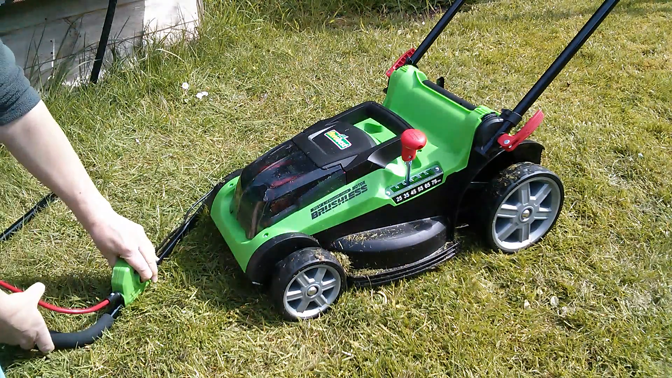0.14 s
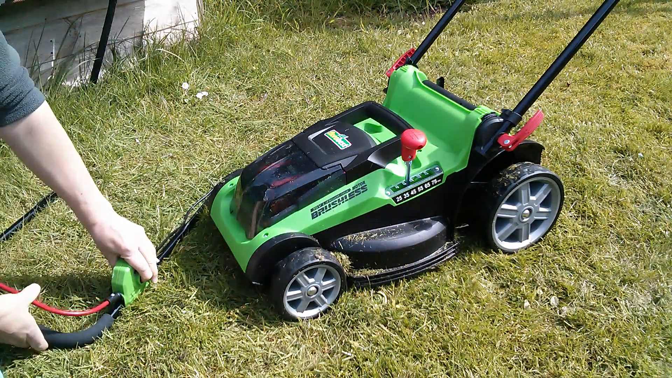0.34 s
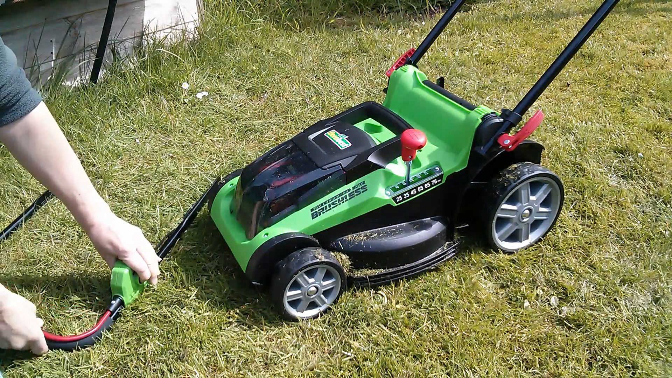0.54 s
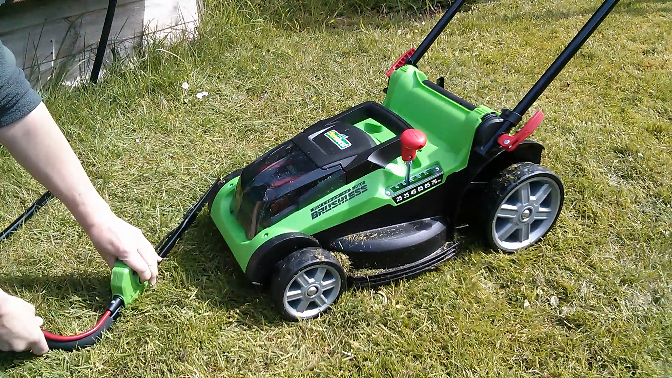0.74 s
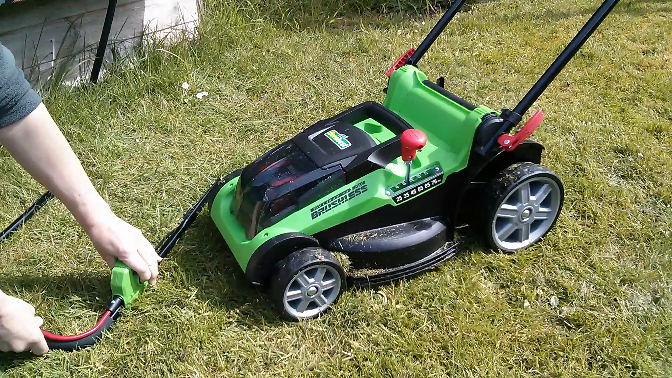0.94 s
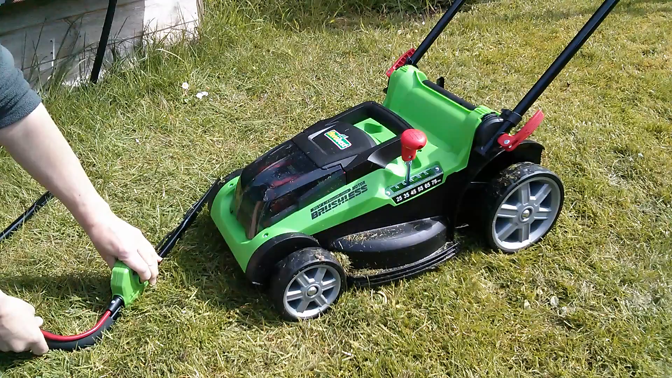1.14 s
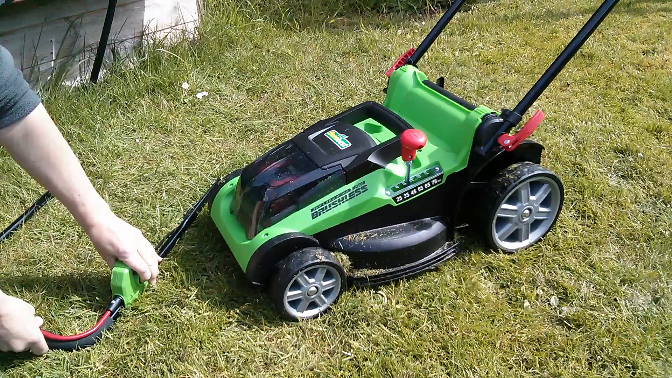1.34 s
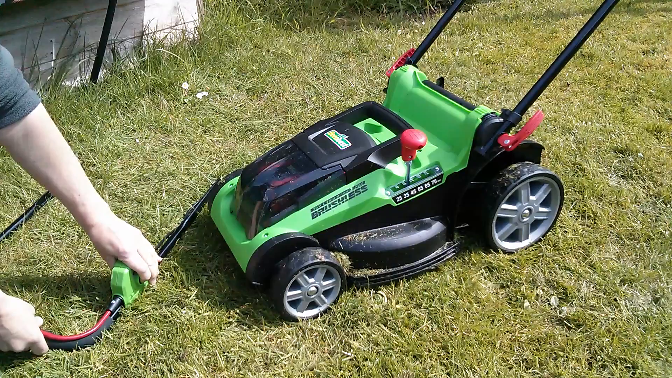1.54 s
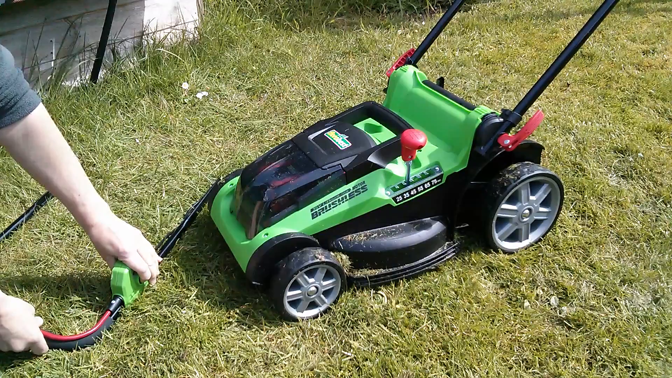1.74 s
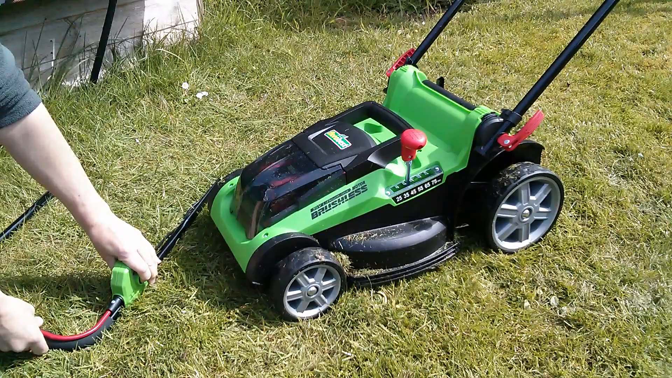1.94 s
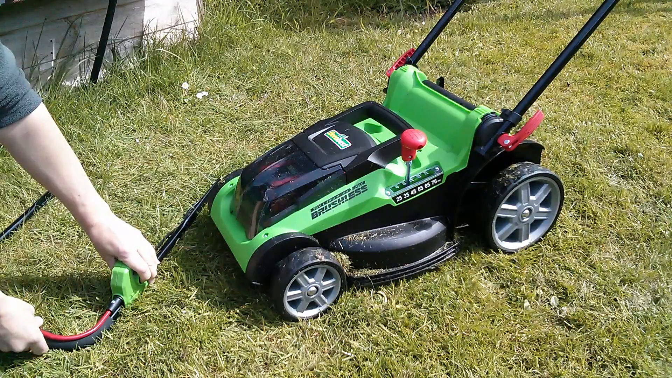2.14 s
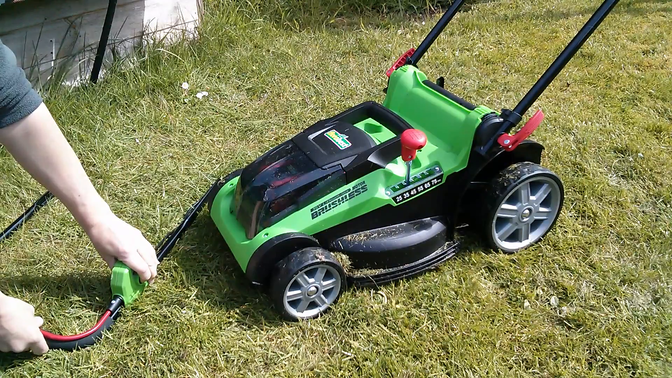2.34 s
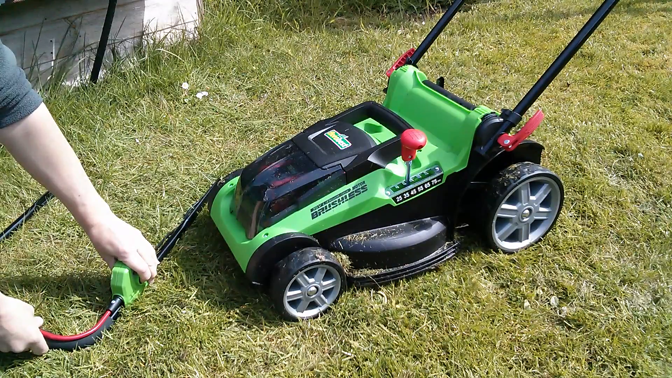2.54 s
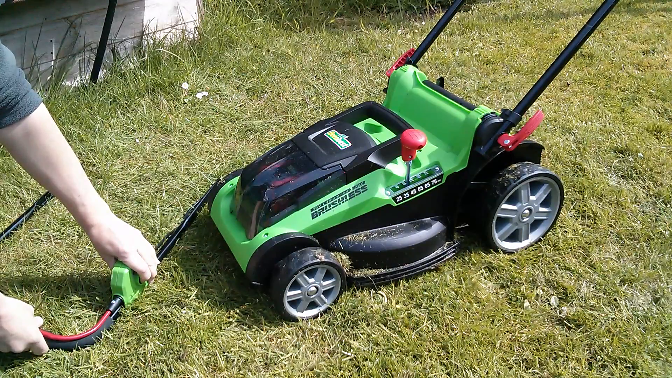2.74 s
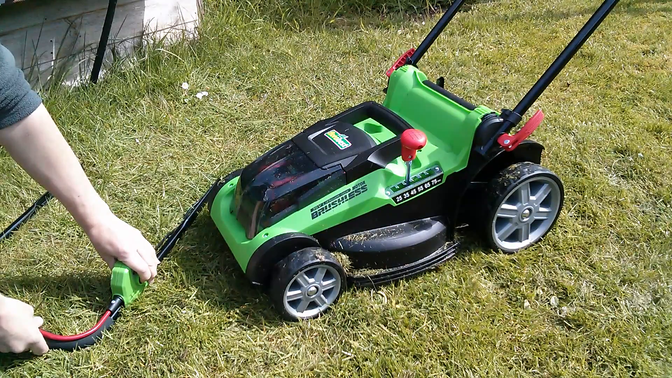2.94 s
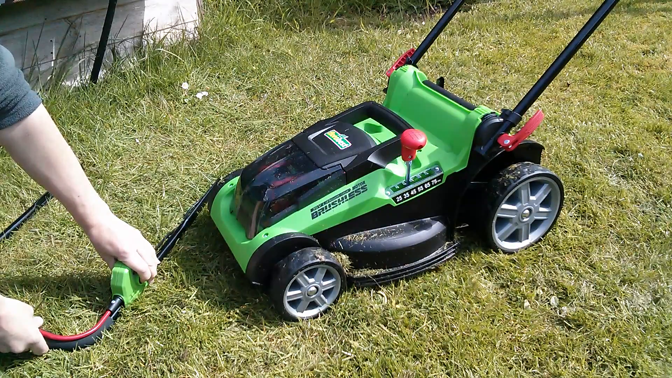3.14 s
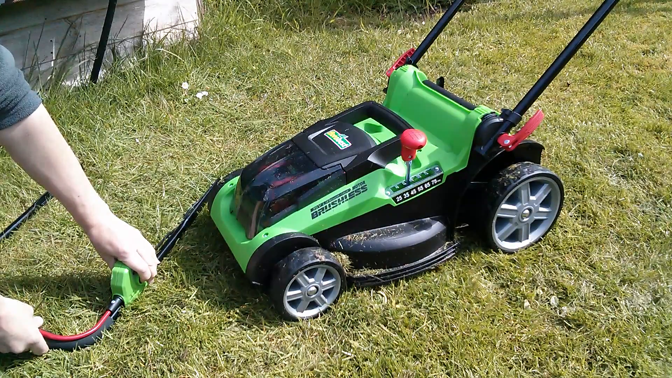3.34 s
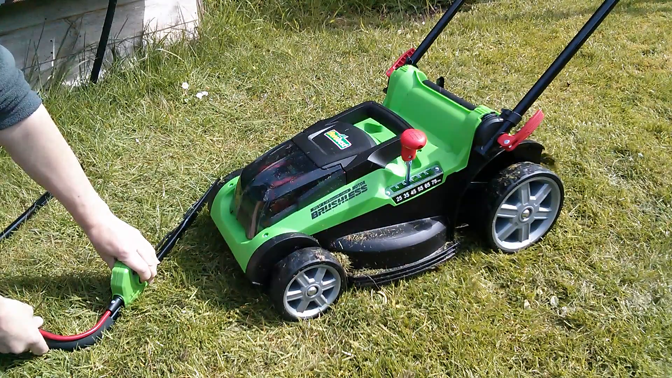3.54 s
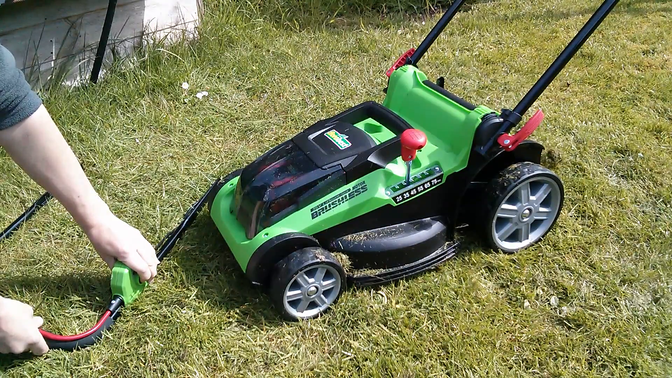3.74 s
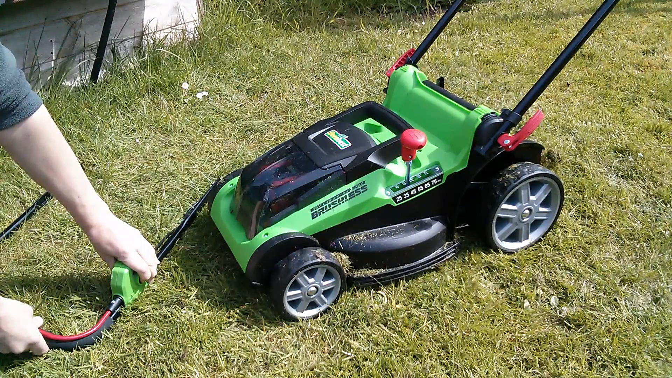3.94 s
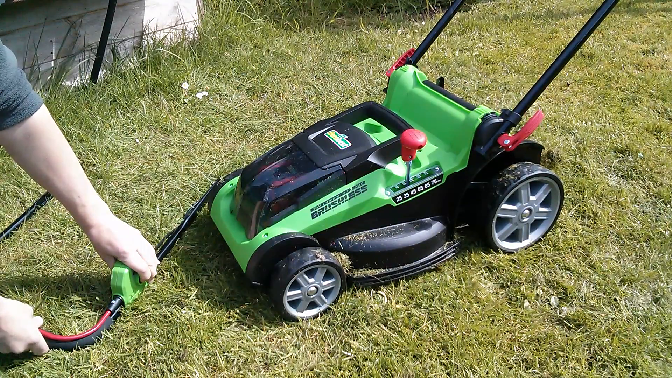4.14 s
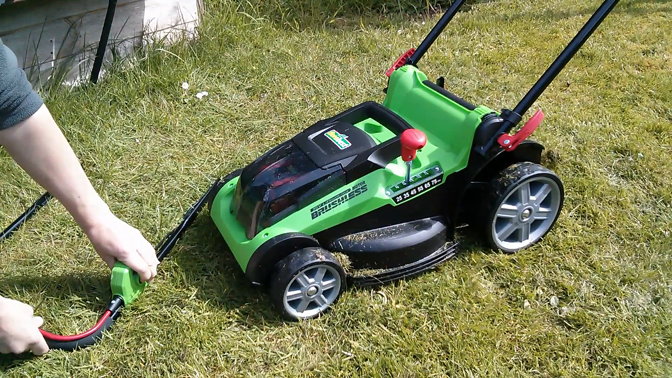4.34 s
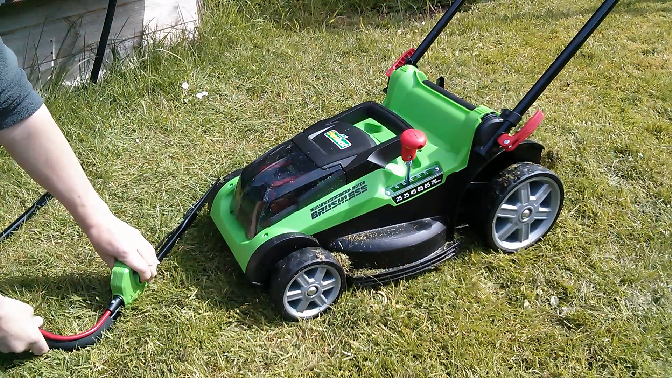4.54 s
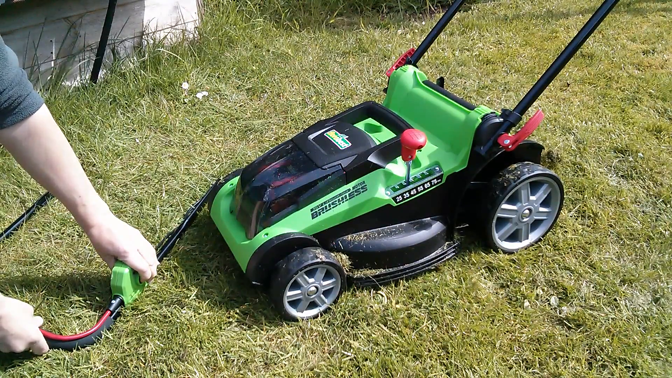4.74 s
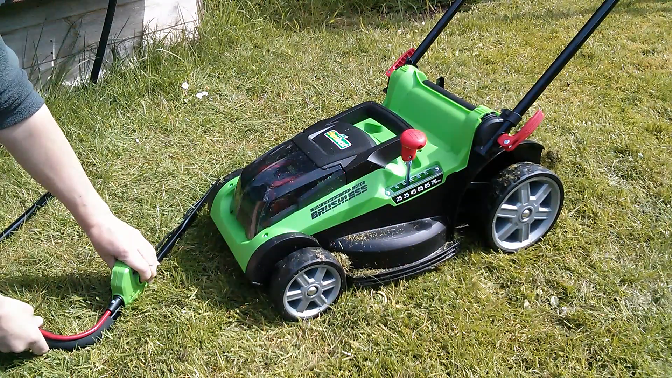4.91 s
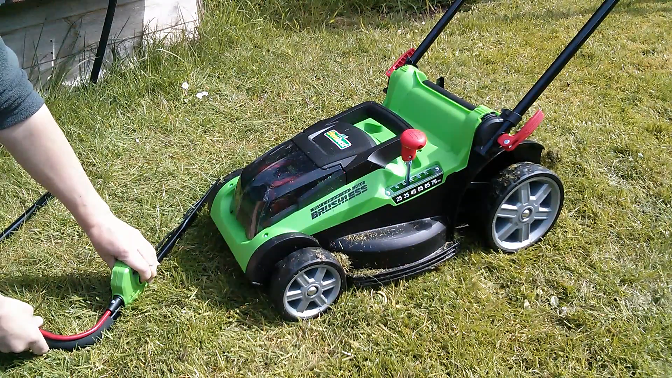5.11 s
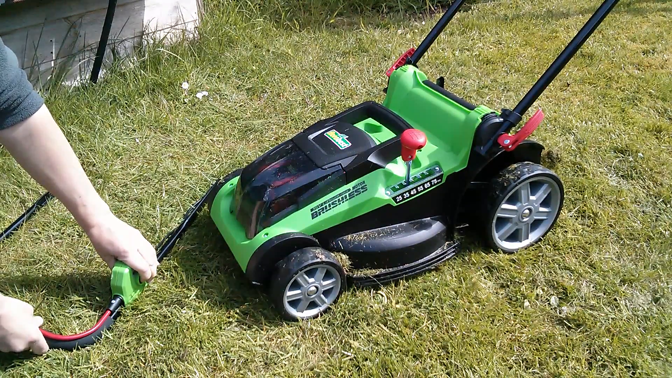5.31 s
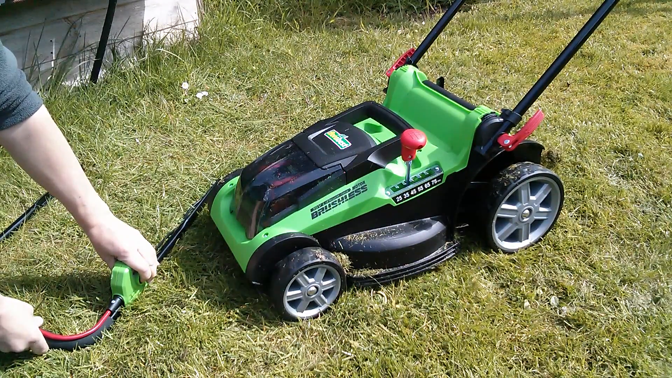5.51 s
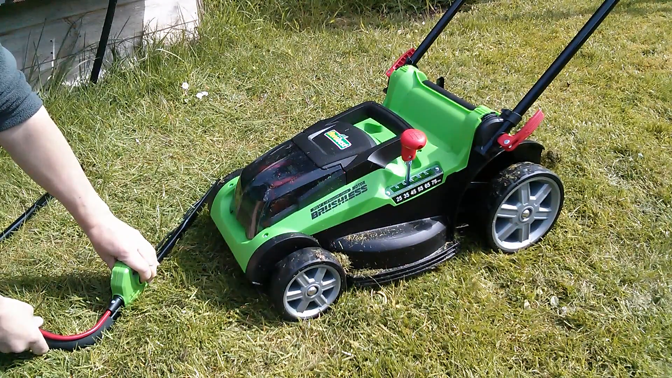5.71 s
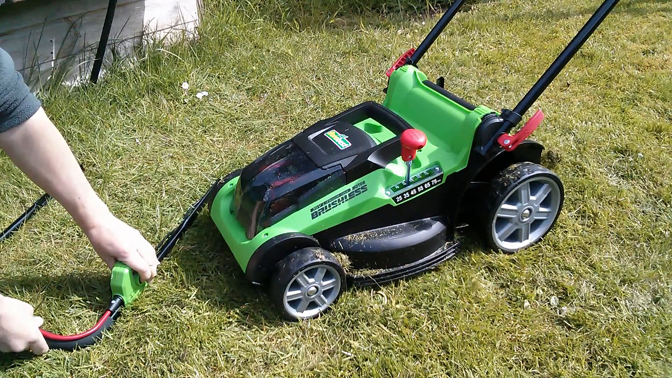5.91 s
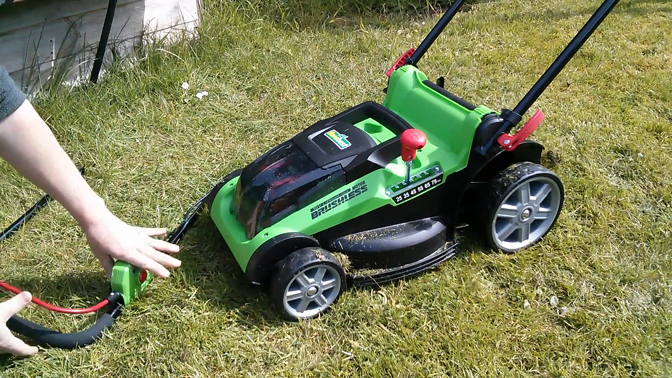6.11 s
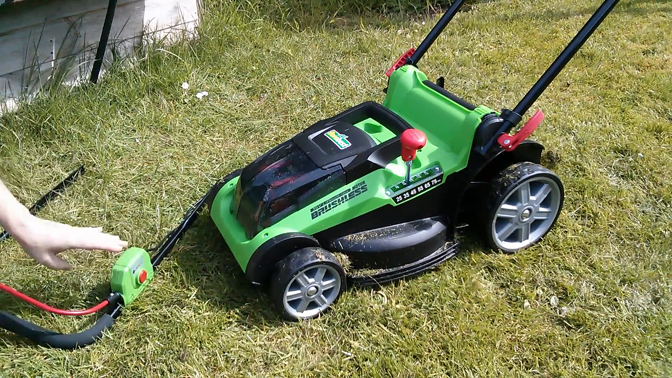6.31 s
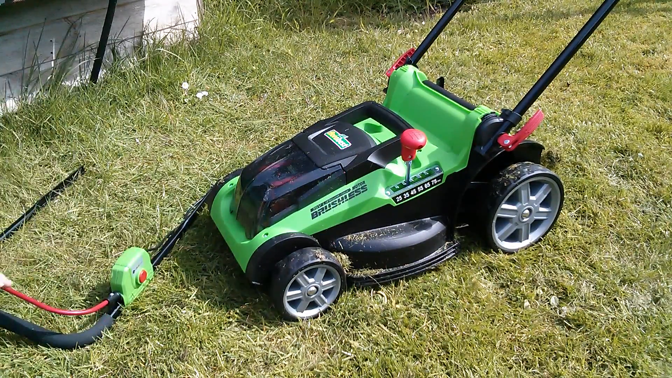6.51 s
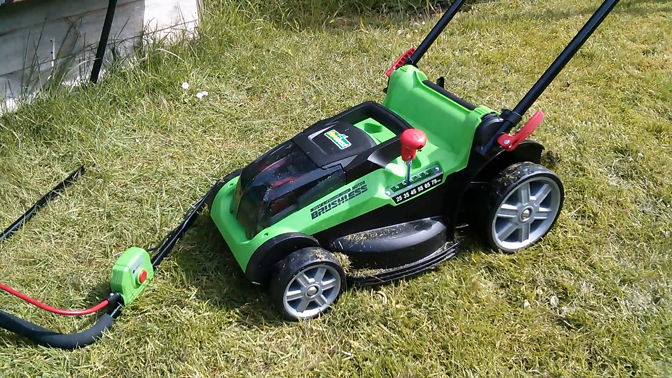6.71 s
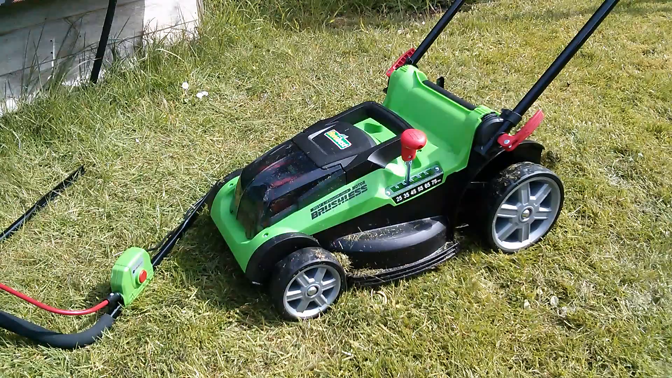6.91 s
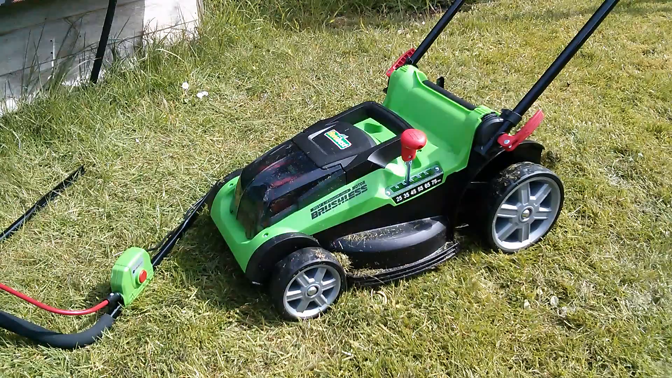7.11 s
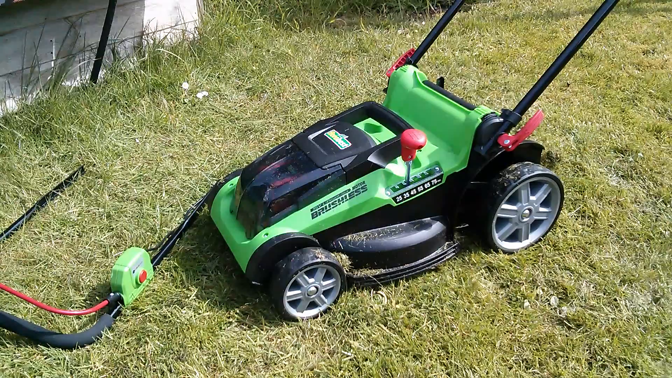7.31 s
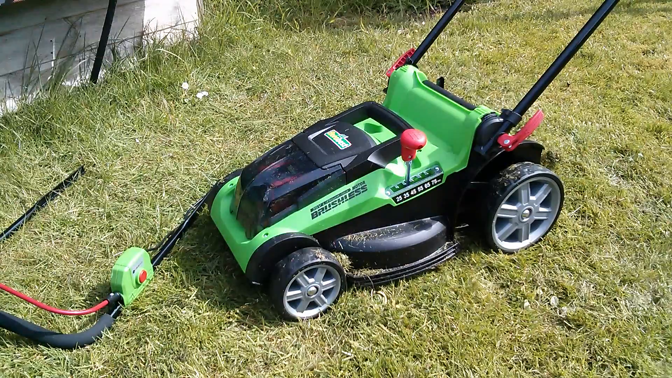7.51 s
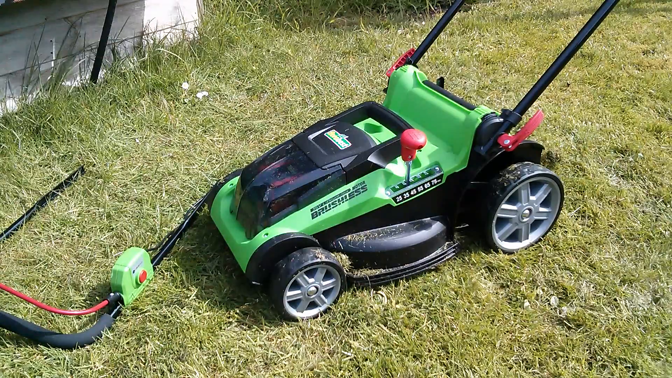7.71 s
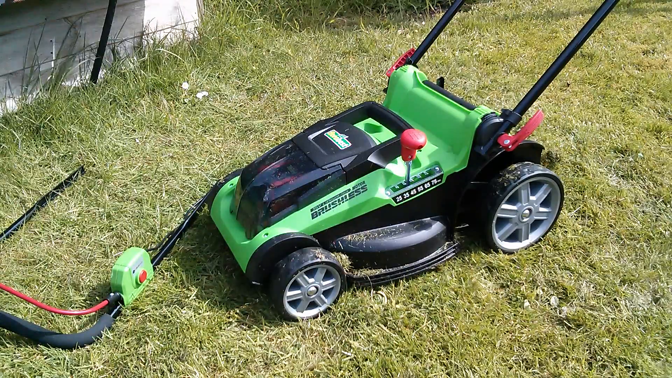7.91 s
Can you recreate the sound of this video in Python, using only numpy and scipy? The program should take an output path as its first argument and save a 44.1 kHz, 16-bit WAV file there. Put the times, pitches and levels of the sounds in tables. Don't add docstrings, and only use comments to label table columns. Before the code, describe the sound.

A quiet, dry garden with soft wind bumps on the microphone. A plastic switch snaps, and after a pause the mower's deck thumps and rings. The blade spins up within two seconds, whine and rushing air climbing together, a few grains ticking on the deck. It holds a steady humming roar, then a sharp double clack releases it and it winds down, with a pulsing electrical brake whine.

```python
import sys
import numpy as np
from scipy import signal
from scipy.fft import rfft, irfft, next_fast_len
from scipy.io import wavfile

SR = 44100
rng = np.random.default_rng(int(sys.argv[2]) if len(sys.argv) > 2 else 0)


def voltage_ratio(decibels):
    exponent = np.asarray(decibels, float) / 20
    return 10 ** exponent


def put_to_file(sound):
    columns = np.atleast_2d(sound).T
    safe = np.clip(columns, -1, 1)
    whole_steps = np.round(safe * 32767)
    wavfile.write(sys.argv[1], SR, whole_steps.astype(np.int16))


N = 351164
T = np.arange(N) / SR

# hz, level_db_per_hz
GARDEN_SPECTRUM = [(150, -35), (250, -20), (436, -17), (718, -13.5), (960, -14), (2040, -29), (3100, -48),
                   (4000, -42), (5200, -64.5), (8800, -120)]
GARDEN_DB = -60.5
GARDEN_GATE_SHARE = 0.23
# start_s, level_db, rise_s, t60_s
GATED_HISS = [
    (0.0, -60.5, 0.0018, 0.73),
    (.48, -49.5, 0.021, 0.53),
    (1.26, -60, .02, 30.0),
]
# hz, level_db_per_hz
GATED_SPECTRUM = [(1470, -42), (2500, -9), (3150, -15), (5840, -2), (6710, -6), (8520, -3), (14300, -3),
                  (15800, 0)]
GATED_FLOOR_DB = -75.5
# time_s, gain_db
GATE = [(1.4, -9.5), (1.75, 0), (2.0, 3.5), (3.0, 1), (3.4, 0.5), (6.2, 0), (6.72, -1.5), (6.95, -13),
        (7.96, -20.5)]
BLADE_GATE_SHARE, WHINE_GATE_SHARE = 0.68, 1.6

# time_s, level_db
WIND_LEVEL = [(0.0, -57.5), (0.24, -46), (0.45, -61.5), (0.8, -49), (1.15, -46), (1.42, -61), (1.75, -41),
              (2.9, -40.5), (3.28, -28), (3.9, -42.5), (4.57, -32.5), (5.7, -36.5), (6.5, -43.5),
              (6.72, -34), (7.22, -38), (7.5, -52.5), (7.7, -62), (7.96, -34)]
# hz, level_db_per_hz
WIND_SPECTRUM = [(12, -44), (20, -23), (54, 0.5), (109, 0.5), (173, -7), (219, -9.5), (344, -25.5),
                 (400, -37), (520, -69), (880, -120)]
# time_s, peak_db, pitch_hz
STRONG_EDDIES = [(.189, -26, 118), (.224, -19.5, 71), (.616, -27, 71), (.75, -21, 105), (.809, -25, 81),
                 (1.098, -24, 143), (1.128, -16, 122), (1.383, -21, 82), (1.624, -19.5, 110),
                 (1.874, -17, 160), (1.897, -12, 108), (2.908, -5.5, 107), (3.25, 0, 172), (3.314, 0, 58),
                 (5.185, -6, 160), (5.238, -5, 124), (5.452, -6, 75), (5.506, 0, 115), (5.543, 0, 87),
                 (5.881, -7.5, 144), (6.158, 3, 144), (6.2, -4, 70), (6.57, -9, 65), (6.594, -4.5, 113),
                 (6.878, -12, 102), (6.928, -10.5, 102), (7.125, -4.5, 151), (7.16, -9.5, 113),
                 (7.737, -25, 136), (7.886, -22, 108)]
SMALL_EDDIES, EDDY_ABOVE_DB, EDDY_SPREAD_DB, EDDY_LOW_HZ, EDDY_OCTAVES = 55, 26, 21.5, 62, 2

# start_s, peak_8khz_db, thud_above_peak_db, mid_4500hz_above_peak_db, t60_s
CLICKS = [(.4615, -55, -8, -10, 0.023), (.474, -54, 2, -6, 0.043), (0.4787, -19.5, -12, -7, 0.0085),
          (.5077, -36, -17, -13, .008), (0.5098, -23.5, -22, -10.5, .01), (.5315, -54, 11, -4, .025),
          (1.272, -38.5, -34, -7, .012), (6.19, -19, -16.5, -16.5, .011), (6.198, -7, -15.5, -14, 0.023),
          (6.201, -6.5, -14.5, -0.5, 0.011), (6.206, -26.5, -20, -16, .022),
          (6.21, -20.5, -27, -16.5, 0.099)]
# centre_hz, width_hz, ring_share
SWITCH_BOX = [(550, 220, 5.4), (1200, 1100, 3.7), (4400, 950, 2.3), (8600, 2600, 1.53), (13800, 4000, 0.65),
              (6200, 960, 0.32), (2900, 1500, 0.65)]
# start_s, peak_db
GRIT = [(1.462, -41), (1.7, -46), (1.983, -29), (2.164, -28.5), (2.351, -27), (2.393, -20), (2.418, -25),
        (2.754, -18.5), (2.891, -19)]
GRIT_THUD_DB, GRIT_MID_DB, GRIT_T60_S = -26, -15, 0.0074
SNAP_TOP_DB = -10.5

# start_s, t60_s, boom_db, deck_db, rattle_db
JERKS = [
    (1.259, 0.17, -28.5, -37, -60),
    (1.289, 0.16, -16.5, -23, -51),
    (1.316, 0.1, -43, -36, -32.5),
    (1.35, 0.16, -51, -33, -42),
]
JERK_RISE_S, BOOM_HZ = 0.019, 240.7
# centre_hz, width_hz, level_db
DECK_MODES = [(496, 67, 6), (806, 16, -4), (1090, 13, -8), (1450, 17, -8), (1900, 33, -36), (2220, 31, -49),
              (2370, 64, -33)]
# centre_hz, width_hz, level_db
RATTLE_MODES = [(6300, 1400, 5), (8800, 1400, 5.5), (10300, 900, -1)]

# time_s, rate_hz
BLADE_RATE = [(1.3, 26.06), (1.42, 32.54), (1.56, 41.84), (1.8, 53.9), (2.06, 64.86), (2.5, 85.1),
              (2.8, 96.7), (2.99, 103.5), (3.2, 105), (3.5, 102.6), (4.9, 102.5), (5.9, 103.2),
              (6.2, 102.5), (6.77, 76.96), (7.25, 58.25), (7.66, 46.07), (7.8, 37.1), (7.96, 28)]
OFF_S, BRAKE_S = 6.2, 6.6
# full_speed_db, growth_db_per_octave, start_swirl_db, gate_share
AIR = [
    (-24, 18, -40.5, 0.67),
    (-25, 23.5, -40.5, 0.76),
    (-34, 25.5, -56, 0.89),
]
# hz, level_db_per_hz
RUMBLE_SPECTRUM = [(140, -13.5), (230, -9), (254, -9.5), (307, -7.5), (356, -11), (410, -4.5),
                   (1000, -14.5), (1300, -50.5), (2200, -120)]
# hz, level_db_per_hz
RUSH_SPECTRUM = [(470, -4), (800, -22), (1000, -4), (1240, 2.5), (1380, 0.5), (1740, -6), (2040, -7),
                 (2820, -22.5), (3000, -25), (3900, -48), (6600, -120)]
# hz, level_db_per_hz
HISS_SPECTRUM = [(1650, -44), (2800, -23), (3500, -17), (3900, -13), (4320, -10.5), (4780, -13.5),
                 (8850, -7.5), (12100, -23), (13500, -28), (15800, -24.5)]
SWIRL_T60_S = 1.8
# centre_hz, width_hz, share
COAST_DULLING = [(3500, 820, 0.42), (13500, 5000, .35)]
# multiple, full_speed_db, growth_db_per_octave
BLADE_TONES = [(1, -27, 28.5), (2, -22, 22), (3, -22.5, 19), (4, -28.5, 18), (5, -35, 20.5), (6, -31, 32.5),
               (8, -42, 27.5), (13, -45.5, 37.5), (14, -39, 41)]

# blade_rate_multiple, level_db, change_by_full_speed_db, deck_panel_share_db
STATOR_LINES = [(8, 0, -6, 0), (12, -20, -6, 0), (16, -19, 0, 0), (24, 0, -42, 0), (32, 2, 4, -19),
                (40, -6, 10, -12), (48, -16, -40, 19), (56, 1, -6, -19), (64, -5, -6, -24),
                (72, -10, -4, -10), (80, 4, -4, -26), (88, 2, 21, -23), (96, -20, 0, -8)]
# hz, gain_db
HOUSING = [(320, -64), (400, -47), (650, -49), (880, -43), (1150, -53), (1550, -45), (2000, -48),
           (2400, -48), (2950, -74), (3200, -58), (3380, -44), (3490, -53), (3630, -44), (3950, -64)]
# hz, gain_db
WITH_ROTOR = [(2100, 0), (2400, 9), (3000, -2), (3200, 6), (3380, -1), (3600, -9), (3900, 9), (4400, -13)]
# hz, gain_db
AGAINST_ROTOR = [(3150, 0), (3380, -11), (3600, -1), (3800, 8), (4300, -8)]
# hz, gain_db
STANDING = [(1100, 0), (1250, 4), (1620, 0), (1800, -14), (2600, -20), (3100, 0)]
# time_s, current_db
CURRENT = [(1.36, -37), (1.43, 9.5), (1.6, -2.5), (2.0, 2.5), (5.3, -0.5), (5.7, 2), (6.19, -2.5),
           (6.21, -40), (7.05, -13), (7.19, 6), (7.32, -30), (7.5, -6), (7.7, -3), (7.85, 2.5), (7.89, -10),
           (7.93, -7), (7.96, -8)]
BRAKE_TREBLE_DB = -13
STALL_BUZZ_DB, STALL_T60_S, RUN_BUZZ_DB = -42.5, 2.1, -52
CHOPPER_HZ, CHOPPER_DB, CHOPPER_FADE_DB, CHOPPER_RISE_S, BRAKE_CHOP_DB = 15910, -60, -23, .08, -83

# hz, echo_share
GROUND = [(500, .0), (2000, .15), (2600, .6), (3500, .85), (4200, .5), (5200, .2), (7000, .0)]
GROUND_DELAY_S = .003
CEILING, TOP_HZ = .66, 15730


def in_time(rows):
    s, *columns = np.transpose(rows)
    return [np.interp(T, s, c) for c in columns]


def at_hz(points, hz):
    table_hz, value = np.array(points).T
    return np.interp(np.log(hz + 1e-9), np.log(table_hz), value)


def rms_one(x):
    return x / np.sqrt(np.mean(x ** 2) + 1e-30)


def drift(rate_hz):
    r = np.exp(-2 * np.pi * rate_hz / SR)
    return rms_one(signal.lfilter([1], [1, -2 * r, r * r], rng.standard_normal(N + SR))[SR:])


def coloured(spectrum):
    size = next_fast_len(N)
    hz = np.fft.rfftfreq(size, 1 / SR)
    ends = [(spectrum[0][0] / 2, -70)] + list(spectrum) + [(spectrum[-1][0] * 1.3, -70)]
    shaped = rfft(rng.standard_normal(size)) * voltage_ratio(at_hz(ends, hz))
    return rms_one(irfft(shaped, size)[:N])


def resonance(x, hz, width_hz):
    r = np.exp(-np.pi * width_hz / SR)
    poles = [1, -2 * r * np.cos(2 * np.pi * hz / SR), r * r]
    return signal.lfilter(np.array([1, 0, -1]) * (1 - r * r) / 2, poles, x)


def burst(start_s, rise_s, t60_s):
    age_s = np.maximum(T - start_s, 0)
    swell = 1 - np.exp(-age_s / max(rise_s, 1e-4))
    return swell * voltage_ratio(-60 * np.minimum(age_s / t60_s, 4))


def garden():
    opened = sum(voltage_ratio(db) * burst(s, rise_s, t60_s) for s, db, rise_s, t60_s in GATED_HISS)
    gated = voltage_ratio(GATED_FLOOR_DB) + opened * (T < OFF_S)
    lift = np.minimum(gated / voltage_ratio(-71.5), 2) ** GARDEN_GATE_SHARE
    murmur = voltage_ratio(GARDEN_DB + drift(3)) * lift * coloured(GARDEN_SPECTRUM)
    return murmur + gated * coloured(GATED_SPECTRUM)


def wind():
    wind_db = in_time(WIND_LEVEL)[0]
    eddies = list(STRONG_EDDIES)
    for i, (when, size, pitch) in enumerate(rng.random((SMALL_EDDIES, 3))):
        s = (i + when) * (N / SR - .1) / SMALL_EDDIES + .05
        peak_db = wind_db[int(s * SR)] + EDDY_ABOVE_DB - EDDY_SPREAD_DB * size
        eddies.append((s, peak_db, EDDY_LOW_HZ * 2 ** (EDDY_OCTAVES * pitch)))
    out = voltage_ratio(wind_db + 8.5 + 2.5 * drift(7.8)) * coloured(WIND_SPECTRUM)
    for s, peak_db, hz in eddies:
        i = int(s * SR)
        age_s = np.arange(-2000, min(2000, N - i)) / SR
        push = np.cos(2 * np.pi * hz * age_s + rng.uniform(0, 2 * np.pi))
        out[i - 2000:i + 2000] += voltage_ratio(peak_db) * np.exp(-(age_s * hz / 0.35) ** 2) * push
    return out


def snaps(events):
    out = np.zeros(N)
    age_s = np.arange(4000) / SR
    for k, (hz, width_hz, ring_share) in enumerate(SWITCH_BOX):
        strikes = np.zeros(N)
        for s, peak_db, thud_db, mid_db, t60_s in events:
            band_db = [thud_db, thud_db, mid_db, 0, SNAP_TOP_DB, -5.0, thud_db - 4.5][k]
            decay_db = -60 * age_s / max(ring_share * t60_s, .002)
            i = int(s * SR)
            strikes[i:i + 4000] += voltage_ratio(peak_db + band_db + decay_db)
        noise = strikes * rng.standard_normal(N)
        ring = resonance(resonance(noise, hz, width_hz), hz, width_hz)
        out += ring * np.sqrt(SR / width_hz)
    return voltage_ratio(-4.5) * out


def switch_clicks():
    return snaps(CLICKS)


def grit():
    return snaps([(s, db, GRIT_THUD_DB, GRIT_MID_DB, GRIT_T60_S) for s, db in GRIT])


def jerk():
    white = rng.standard_normal((2, N))
    cycle = 2 * np.pi * BOOM_HZ * T
    boom = np.cos(cycle) + .5 * np.cos(2 * cycle) + 0.14 * np.cos(3 * cycle)
    deck, rattle = np.zeros(N), np.zeros(N)
    for hz, width_hz, db in DECK_MODES:
        deck += voltage_ratio(db) * resonance(white[0], hz, 2 * width_hz) / np.sqrt(width_hz)
    deck = rms_one(signal.sosfilt(signal.butter(4, 2100, fs=SR, output="sos"), deck))
    for hz, width_hz, db in RATTLE_MODES:
        rattle += voltage_ratio(db) * resonance(resonance(white[1], hz, width_hz), hz, width_hz)
    rattle = rms_one(rattle)
    out = np.zeros(N)
    for s, t60_s, boom_db, deck_db, rattle_db in JERKS:
        body = voltage_ratio(boom_db) * boom + voltage_ratio(deck_db) * deck + voltage_ratio(rattle_db) * rattle
        out += 2.37 * burst(s, JERK_RISE_S, t60_s) * body
    return out


def air(speed_hz, turn):
    octaves = np.log2(speed_hz / 103)
    gate_db = in_time(GATE)[0]
    swirl = burst(JERKS[1][0], .05, SWIRL_T60_S)
    rumble, rush, hiss = [voltage_ratio(db + growth_db * octaves + share * gate_db) + voltage_ratio(swirl_db) * swirl
                          for db, growth_db, swirl_db, share in AIR]
    gust = drift(2.9)
    puff = 1 + 0.12 * np.sin(turn)
    out = rumble * voltage_ratio(2.5 + 1.04 * gust + drift(26)) * coloured(RUMBLE_SPECTRUM)
    out += rush * voltage_ratio(-0.5 + .5 * gust + 0.5 * drift(22)) * puff * coloured(RUSH_SPECTRUM)
    fine = coloured(HISS_SPECTRUM)
    lost = sum(share * resonance(fine, hz, width_hz) for hz, width_hz, share in COAST_DULLING)
    fine = fine - (T > OFF_S) * lost
    out += hiss * voltage_ratio(1 + 0.27 * gust + 0.56 * drift(55)) * puff * fine
    return out * np.clip((T - JERKS[0][0]) / 0.032, 0, 1)


def blade(speed_hz, turn):
    gate_db = BLADE_GATE_SHARE * in_time(GATE)[0]
    octaves = np.log2(speed_hz / np.max(speed_hz))
    flutter = 0.054 * drift(2.2)
    out = np.zeros(N)
    for k, level_db, growth_db in BLADE_TONES:
        tune = k * speed_hz / BOOM_HZ
        lag = np.arctan2(.12 * tune, 1 - tune ** 2)
        boom_db = 3.9 * np.exp(-(np.log(tune) / 0.21) ** 2)
        gain = voltage_ratio(level_db + growth_db * octaves + gate_db + 0.42 * drift(3.8) + boom_db)
        out += np.sqrt(2) * gain * np.cos(k * (turn + flutter) - lag + 0.45 * drift(1.9))
    return out * (T > JERKS[0][0])


def stator_whine(speed_hz, turn, full, current_db, gate_db):
    waves = {8: WITH_ROTOR, 16: AGAINST_ROTOR, 0: STANDING}
    out = np.zeros(N)
    for k, level_db, change_db, panel_db in STATOR_LINES:
        hz = k * speed_hz
        gain_db = level_db + change_db * full + panel_db * (hz < 2900) + at_hz(HOUSING, hz) + current_db
        gain_db += gate_db * np.clip((hz - 1050) / 350, 0, 1)
        if k % 24 in waves:
            gain_db += at_hz(waves[k % 24], hz)
        gain_db += BRAKE_TREBLE_DB * (T > OFF_S) * (hz > 1150)
        gain_db += (2.4 - 1.8 * full) * drift(11)
        out += np.sqrt(2) * voltage_ratio(gain_db) * np.sin(k * turn + rng.uniform(0, 2 * np.pi))
    return out


def chopper(turn, full):
    carrier = 2 * np.pi * CHOPPER_HZ * T
    sides = np.sin(carrier - 8 * turn) + voltage_ratio(-14) * np.sin(carrier - 24 * turn)
    rise = np.clip((T - CURRENT[0][0]) / CHOPPER_RISE_S, 0, 1)
    level = voltage_ratio(CHOPPER_DB + CHOPPER_FADE_DB * full ** .4) * rise * (T < OFF_S)
    level += voltage_ratio(BRAKE_CHOP_DB) * np.clip((T - BRAKE_S) / .15, 0, 1)
    return np.sqrt(2) * level * sides


def shell_buzz(full, current_db, gate_db):
    white = rng.standard_normal(N)
    shell = rms_one(resonance(resonance(white, 3550, 800), 3550, 800))
    stall = voltage_ratio(STALL_BUZZ_DB) * burst(JERKS[0][0], 0.017, STALL_T60_S)
    run = voltage_ratio(RUN_BUZZ_DB + current_db + gate_db) * full * (T < OFF_S)
    return (stall + run) * shell


def motor(speed_hz, turn):
    current_db = in_time(CURRENT)[0]
    gate_db = WHINE_GATE_SHARE * in_time(GATE)[0]
    full = (speed_hz / np.max(speed_hz)) ** 4
    tones = stator_whine(speed_hz, turn, full, current_db, gate_db) + chopper(turn, full)
    return tones * (T > CURRENT[0][0]) + shell_buzz(full, current_db, gate_db)


def ground_echo(x):
    size = next_fast_len(N + 512)
    hz = np.fft.rfftfreq(size, 1 / SR)
    share = np.clip(at_hz(GROUND, hz), 0, 1)
    comb = (1 + share * np.exp(-2j * np.pi * hz * GROUND_DELAY_S)) / np.sqrt(1 + share ** 2)
    return irfft(rfft(x, size) * comb, size)[:N]


def scene():
    speed_hz = in_time(BLADE_RATE)[0]
    turn = 2 * np.pi * np.cumsum(speed_hz) / SR
    mower = jerk() + air(speed_hz, turn) + blade(speed_hz, turn) + motor(speed_hz, turn)
    return (garden() + wind() + switch_clicks() + grit() + ground_echo(mower))[None]


def low_pass(x):
    return signal.sosfilt(signal.butter(12, 16530, fs=SR, output="sos"), x)


def record(dry):
    held = dry / (1 + (dry / CEILING) ** 6) ** (1 / 6)
    cut = signal.sosfilt(signal.ellip(12, .3, 70, TOP_HZ, fs=SR, output="sos"), held)
    cut *= np.clip((N / SR - T) / .006, .3, 1)
    return low_pass(cut)


dry = scene()
out = record(dry)
put_to_file(out)
```